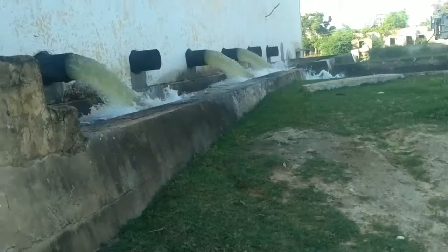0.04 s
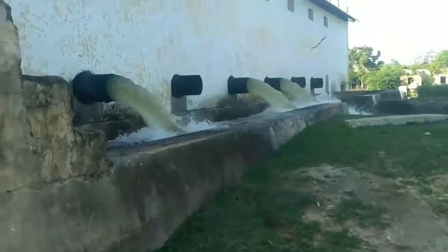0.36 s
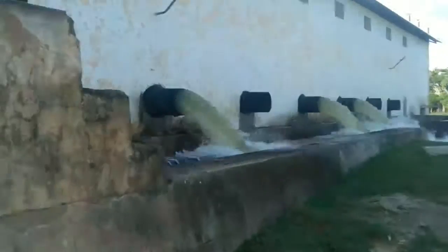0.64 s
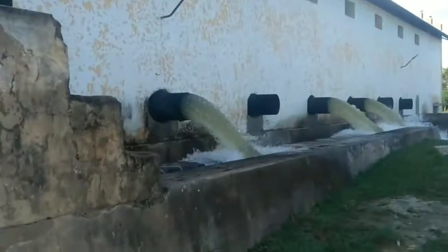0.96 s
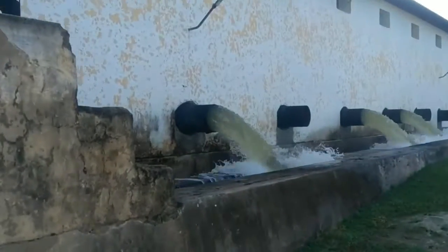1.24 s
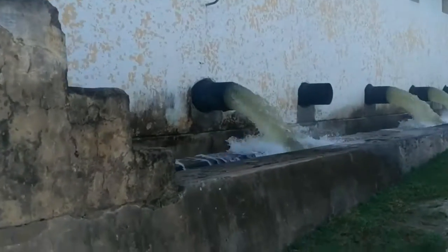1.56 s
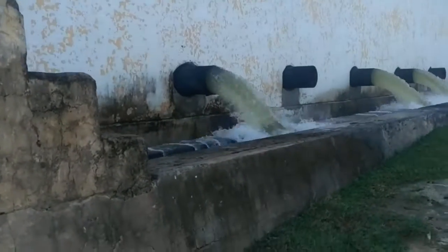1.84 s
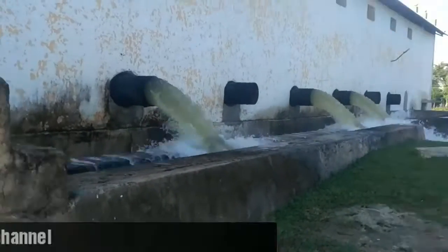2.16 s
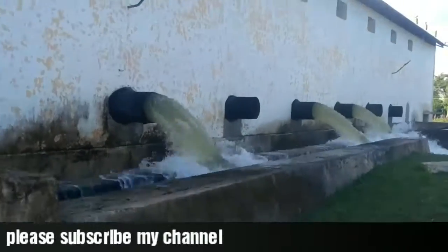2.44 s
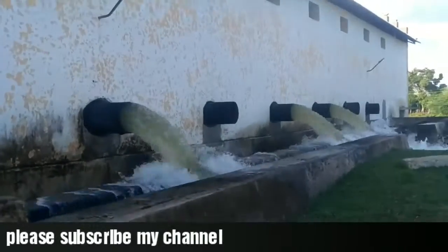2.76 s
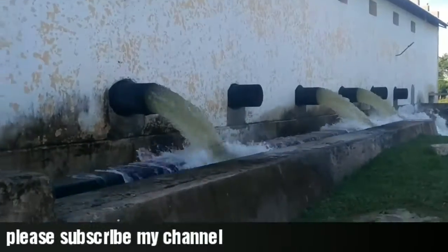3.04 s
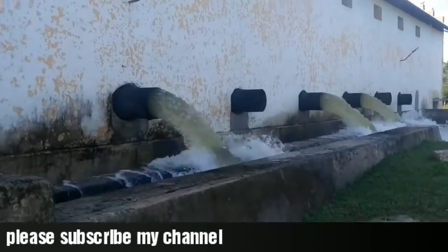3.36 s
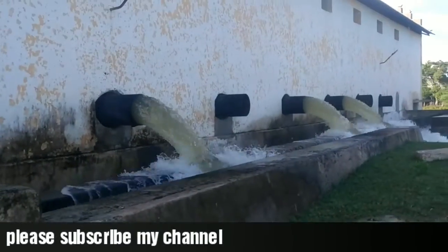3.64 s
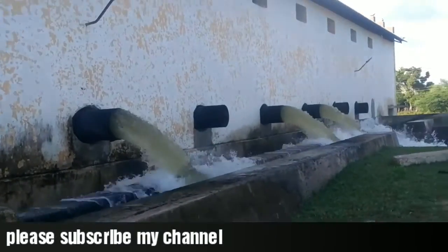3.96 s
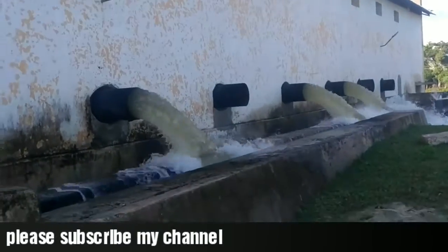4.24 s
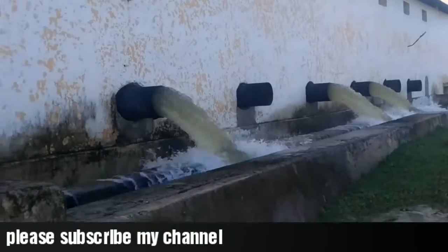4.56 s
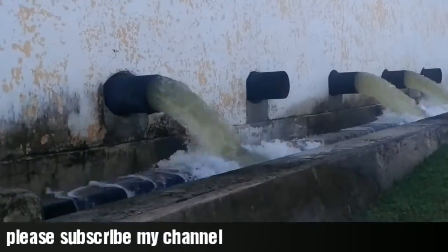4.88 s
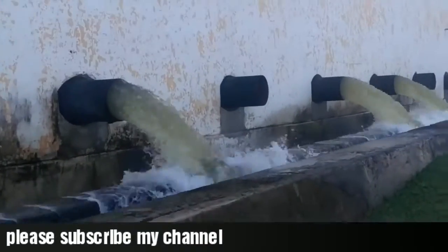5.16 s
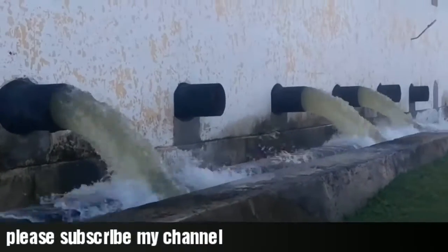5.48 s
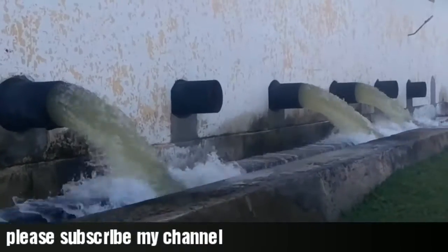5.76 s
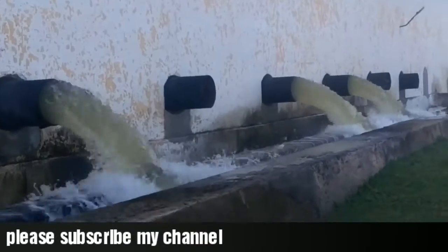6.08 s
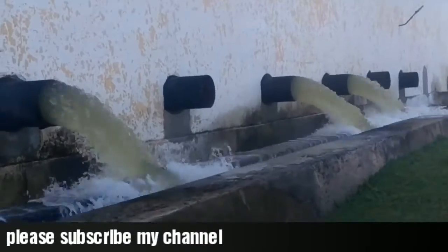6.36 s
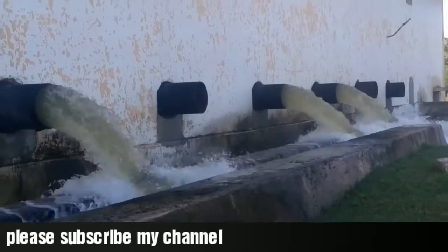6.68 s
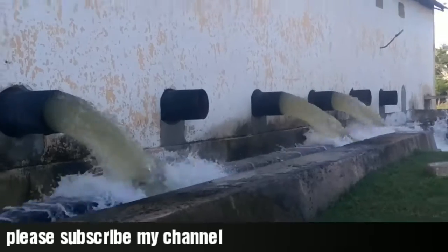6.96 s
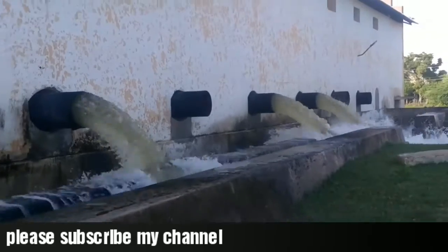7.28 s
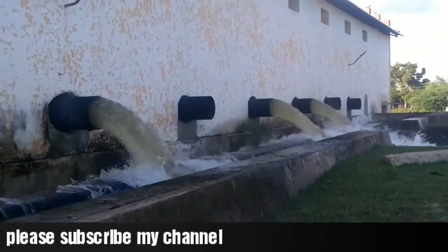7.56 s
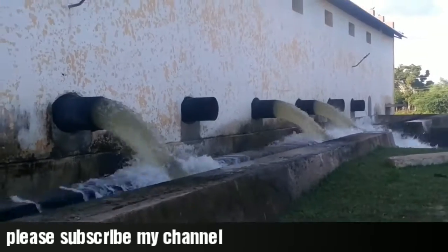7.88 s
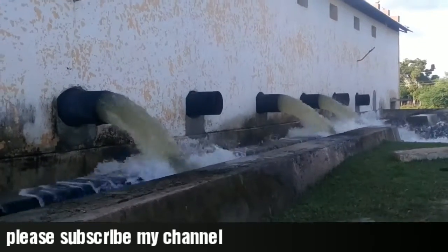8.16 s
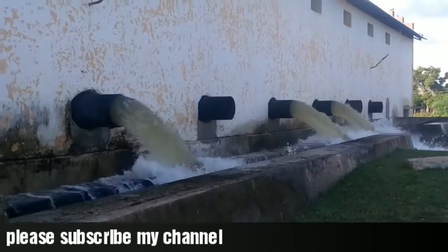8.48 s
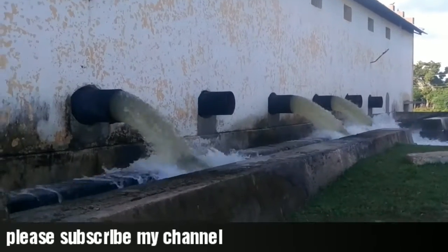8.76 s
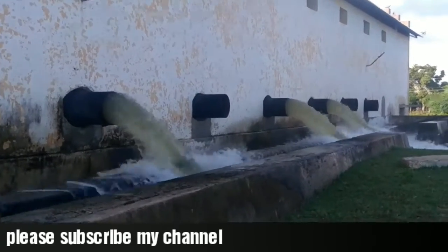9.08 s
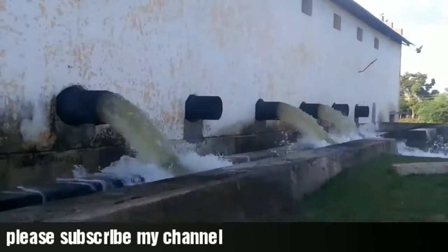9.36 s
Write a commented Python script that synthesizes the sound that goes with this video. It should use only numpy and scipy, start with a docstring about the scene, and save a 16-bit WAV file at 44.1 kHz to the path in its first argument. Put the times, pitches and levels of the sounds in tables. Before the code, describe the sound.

After a loud rush and a sharp knock, jets of water churn, bubble and fizz in an outdoor channel under gusts of wind rumble.

```python
"""The water sounds loud and full at first, with a knock, then turns quieter and muffled.
Beside a pump house, thick jets fall from pipes into a concrete channel. Close by, the plunge churns with
big bubbles, drops splash, spray hisses and foam fizzes; the farther jets merge into a wash.
One microphone stands in the open, and wind buffets it."""
import sys
import numpy as np
from scipy import signal
from scipy.fft import rfft, irfft, next_fast_len
from scipy.io import wavfile

SR = 44100
rng = np.random.default_rng(int(sys.argv[2]) if len(sys.argv) > 2 else 0)


def put_to_file(sound):
    """Save the sound as 16-bit audio at rate SR, in the file named by the first command-line argument."""
    columns = np.atleast_2d(sound).T  # one column per channel
    safe = np.clip(columns, -1, 1)
    whole_steps = np.round(safe * 32767)
    wavfile.write(sys.argv[1], SR, whole_steps.astype(np.int16))


N = 415422
TIME = np.arange(N) / SR

# The loud opening, by layer. Each row: level in dB as the hold ends, that time in seconds,
# then rise, climb and fall in dB per second.
LOUD_OPENING = { "wind": (-27.5, 1.12, 138, -1, 170), "plunge": (-31, 1.1, 90, -0.5, 170),
                "babble": (-35, 1.1, 75, 1.5, 270), "splash": (-34, 1.09, 35, 2, 18),
                "spray": (-29.5, 1.1, 20, 26, 107), "fizz": (-21.5, 1.15, 73, 21, 288),
                "hiss": (-34, 1.15, 150, 4, 448), }
# The jet surges and drags more air under. Each row: time in seconds, large and small bubble levels in dB.
JET_SURGES = [(0.935, -34, -42), (1.4, -51, -46), (2.96, -45, -47), (3.24, -43, -53), (3.33, -45, -52),
              (3.41, -42.5, -46), (3.56, -52, -46.5), (3.77, -58, -48.5), (3.94, -43, -48),
              (4.1, -36.5, -45.5), (4.73, -45, -52), (5.07, -45, -58), (5.25, -45, -51), (5.96, -43.5, -55),
              (6.3, -59, -50.5), (6.63, -46, -58), (6.9, -39, -63), (7.22, -41, -55), (7.39, -42.5, -64),
              (7.69, -37.5, -52), (8.01, -43.5, -54), (8.31, -55, -48), (8.4, -58, -46), (8.56, -44.5, -54),
              (8.79, -55, -48), (9.25, -45, -58), (9.38, -44, -52)]
# Gulps of trapped air and slaps of water. Each row: time in seconds, level in dB before the trim,
# pitch in Hz, half-width in seconds.
AIR_GULPS = [(2.342, -37, 645, 0.0064), (2.351, -42, 1290, .008), (2.73, -35.5, 1950, .011),
             (2.967, -39, 516, .008), (3.004, -35, 2730, 0.0059), (3.013, -40, 1356, 0.0074),
             (3.346, -32, 409, 0.0068), (3.398, -38, 445, 0.014), (3.805, -41, 2870, 0.009),
             (3.92, -41, 1090, .016), (4.086, -35, 913, 0.0096), (4.096, -24, 359, 0.004),
             (4.110, -20.5, 351.4, 0.0038), (4.156, -40, 1270, .01), (4.40, -39, 2750, 0.028),
             (4.567, -35, 2690, 0.013), (4.733, -30.5, 398, .006), (4.754, -27, 430, 0.0038),
             (5.118, -41.5, 2140, 0.014), (5.285, -41, 925, 0.016), (5.535, -38, 934, .006),
             (5.94, -32, 287.5, 0.0055), (6.296, -38, 2460, 0.0074), (6.304, -42, 796, .009),
             (6.899, -34, 473, 0.0059), (7.262, -41, 732, 0.014), (7.97, -40.5, 1140, 0.0091),
             (8.065, -42.5, 1130, 0.014), (8.294, -39, 904, .011), (8.775, -40, 1378, 0.011),
             (9.236, -40.5, 538, .01)]
# Handfuls of drops land together. Each row: time in seconds, level in dB, bubble pitch in Hz.
DROP_SPURTS = [(3.05, -44.5, 2800), (4.27, -48.5, 2750), (4.95, -46, 2600), (5.14, -49.5, 2450),
               (5.52, -46, 2550), (5.77, -48, 2600), (6.08, -48, 2510), (6.48, -48, 2630), (6.9, -49, 2450),
               (8.86, -48.5, 2950), (8.92, -50.5, 3200), (9.37, -48, 2800)]

# Slow level changes of drops, foam and farther jets. Each row: time in seconds, dB before any trim.
DROP_LEVELS = [(1.95, -66), (2.35, -49), (3.5, -48.5), (4.5, -48.5), (6.4, -48), (8.3, -49.5),
               (9.42, -50.5)]
FOAM_LEVELS = [(1.3, -41.5), (1.7, -39.5), (2.15, -40), (2.45, -37.5), (2.65, -41.5), (4.2, -41),
               (5.6, -38.5), (8.2, -39), (9.2, -43.5), (9.42, -39.5)]
FAR_JET_LEVELS = [(1.3, -55), (2.4, -53), (4.5, -55), (4.8, -51.5), (8.1, -51.5), (8.35, -55.5),
                  (9.42, -57)]

# Spells of louder high hiss, narrow hiss and bright hiss. Each row: start and end in seconds, level in dB.
HIGH_HISS_SPELLS = [(1.28, 1.44, -35.5), (1.6, 1.72, -45), (2.03, 2.04, -45), (2.74, 2.75, -39),
                    (2.98, 3.02, -42), (3.15, 3.22, -46), (4.7, 8.05, -44.5)]
HISS_TRAILS = [(1.26, 1.35, -39), (1.47, 1.66, -41), (3.87, 4.42, -52.5)]
HISS_SWELLS = [(2.77, 3.09, -40)]

# Gusts on the microphone. Each row: time in seconds, level in dB, half-width in seconds.
WIND_GUSTS = [(1.112, -27, .012), (1.2, -38, .025), (1.28, -43, .02), (1.6, -36, 0.017), (1.93, -35, .05),
              (2.155, -33.5, 0.041), (2.42, -37, .08), (2.558, -31, 0.052), (3.03, -44, 0.04),
              (4.03, -32.5, .02), (4.603, -34.5, 0.078), (5.164, -40, .025), (5.253, -34, 0.034),
              (5.77, -40.5, .04), (6.26, -36, .03), (6.623, -30, 0.087), (6.8, -38, 0.028),
              (7.192, -37, 0.052), (7.753, -26, 0.061), (7.859, -24.5, 0.024), (8.068, -33.5, 0.046),
              (8.27, -34, 0.027), (9.25, -42, .03)]
# Hard buffets of air. Each row: time in seconds, level in dB, pitch in Hz, half-width in seconds.
WIND_BUFFETS = [(.815, -2, 140.1, 0.0018), (.83, -18.5, 76, .01), (.934, -9, 175, 0.0044),
                (1.108, -23.5, 139.8, 0.0099), (1.592, -26, 103.4, 0.0025), (2.135, -21.5, 78.4, .009),
                (2.17, -25.5, 108.2, 0.0068), (2.337, -24, 95.7, 0.013), (2.368, -23, 91, 0.0094),
                (2.412, -22, 69.7, .009), (2.446, -21, 101, .006), (2.494, -20, 97, 0.0047),
                (2.541, -12, 87, 0.0059), (2.6, -24, 78.2, 0.0075), (4.025, -24, 81.7, .009),
                (4.61, -26, 85.3, 0.018), (4.688, -27, 112.5, 0.0038), (5.856, -29.5, 100.4, .005),
                (6.251, -28, 86.3, 0.0081), (6.6, -28.5, 220, 0.011), (6.63, -27, 83, 0.011),
                (7.70, -27.5, 229.6, 0.013), (7.76, -24.5, 91.5, 0.016), (7.854, -12, 100.6, 0.0062),
                (8.26, -25.5, 69.2, 0.015), (8.5, -27, 75, 0.0076), (8.57, -29, 70, .008)]

# The colour of each sound at the microphone. Each row: frequency in Hz, relative level in dB.
PLUNGE_SPECTRUM = [(120, -19), (200, -0.5), (260, 0.5), (340, -1), (400, -2), (490, -7), (560, -16),
                   (750, -45)]
BABBLE_SPECTRUM = [(350, -28), (540, -4.5), (630, -5), (750, -1.5), (900, -0.5), (1050, -3), (1250, -12),
                   (1650, -15)]
SPLASH_SPECTRUM = [(1000, -27), (1250, -4.5), (1550, -2.5), (1850, -5), (2250, -3), (2700, -0.5),
                   (3100, -2), (3500, -4), (3900, -8.5), (4500, -38)]
SPRAY_SPECTRUM = [(5200, -12.5), (6100, -7), (7000, -3.5), (8000, 0.5), (9200, 0), (9700, -2.5),
                  (10800, -19)]
FOAM_SPECTRUM = [(7500, -20), (9400, -8), (10500, -2.5), (11600, 0.5), (12800, -1.5), (14400, -6),
                 (15200, -11.5), (16000, -16)]
FAR_JET_SPECTRUM = [(1200, -13), (2500, -2.5), (3700, -1), (4600, 3.5), (5800, -2), (7000, -17.5),
                    (10000, -17)]
OPENING_SPECTRUM = [(400, -10), (600, 8), (850, -2), (1400, -7), (2000, -1), (2700, -13), (3500, 2),
                    (4000, 2), (4600, 1.5), (5800, 1), (6800, -2), (9000, -20)]
TRAIL_SPECTRUM = [(1100, -33), (1500, -9), (2300, -22), (2650, 4), (3100, 1), (3500, -19), (3900, -39)]
SWELL_SPECTRUM = [(1800, -10.5), (3200, -2.5), (4100, 1), (4450, -3), (4750, -17), (5000, 0), (5350, 0.5),
                  (6500, -4.5), (8500, -7)]
WIND_SPECTRUM = [(15, -44), (25, -22), (40, -5.5), (62, 3), (85, 1), (135, -2), (190, -5), (250, -10),
                 (320, -20), (450, -28), (900, -46)]
KNOCK_SPECTRUM = [(200, 5), (900, -1), (2500, -4), (5500, -11), (8000, -3.5), (11500, 5.5), (15500, -5.5)]


def from_db(db):
    """Decibels to gain."""
    return 10 ** (np.asarray(db) / 20)


def rms_one(x):
    """Scale to an rms of 1."""
    return x / np.sqrt(np.mean(x ** 2) + 1e-20)


def together(*gains):
    """Unrelated sounds add in power."""
    return np.sqrt(sum(g ** 2 for g in gains))


def level_curve(rows):
    """Gain at every sample from rows of seconds and dB."""
    return from_db(np.interp(TIME, *np.transpose(rows)))


def bell(t, half_width):
    """A smooth swelling around t = 0."""
    return np.exp(-.5 * np.minimum((t / half_width) ** 2, 100))


def spell(start, end, db, rise, fall):
    """Gain that rises, holds and falls; rise and fall in dB per second."""
    below_db = rise * np.maximum(start - TIME, 0) + fall * np.maximum(TIME - end, 0)
    return from_db(db - np.minimum(below_db, 120))


def spells(rows, rise, fall):
    """Gain of several spells that share one rise and fall."""
    return together(*(spell(start, end, db, rise, fall) for start, end, db in rows))


def drift(rate):
    """A smooth random wander of rms 1 that changes about rate times a second."""
    step, settle = 40, 2000
    pole = np.exp(-2 * np.pi * rate * step / SR)
    noise = rng.standard_normal(N // step + settle + 2)
    slow = signal.lfilter([1], [1, -2 * pole, pole * pole], noise)[settle:]
    return np.interp(np.arange(N) / step, np.arange(len(slow)), rms_one(slow))


def coloured(x, spectrum):
    """Shape a steady sound by rows of Hz and dB, to an rms of 1."""
    size = next_fast_len(N)
    hz, db = np.transpose(spectrum)
    bins = np.maximum(np.arange(size // 2 + 1) * SR / size, 1)
    gain = from_db(np.interp(np.log(bins), np.log(hz), db, left=-90, right=-90))
    return rms_one(irfft(rfft(x, size) * gain, size)[:N])


def pings(low_hz, high_hz, per_s, cycles, spread_db, clump_db, clump_hz, pitches):
    """Bubbles or droplets ring at random, in clumps; each dies by 60 dB over the given cycles."""
    out, shared = np.zeros(N), 0.36 * drift(clump_hz)
    floor = 1e-12 * rng.standard_normal(N)
    for hz in np.geomspace(low_hz, high_hz, pitches):
        at = rng.integers(0, N, int(per_s / pitches * N / SR))
        sizes = from_db(spread_db * np.minimum(rng.exponential(1, len(at)), 4))
        kicks = np.bincount(at, sizes * rng.choice([-1, 1], len(at)), N) + floor
        decay, angle = np.exp(-np.log(1000) * hz / (cycles * SR)), 2 * np.pi * hz / SR
        rings = signal.lfilter([1, 0, -1], [1, -2 * decay * np.cos(angle), decay * decay], kicks)
        # each pitch surges mostly on its own, a little with all the others
        clumps = from_db(clump_db * (drift(clump_hz) + shared))
        out += np.sqrt(hz) * rms_one(rings) * clumps  # even power per Hz
    return out


def throbs(rows, waver):
    """Each row is a short ringing that swells and dies; its pitch wavers by the share waver."""
    out, span = np.zeros(N), 2 ** 13
    for s, db, hz, half_width in rows:
        wander = signal.lfilter([1], [1, -.99], rng.standard_normal(span)) / 7
        at = np.clip(round(s * SR) + np.arange(span) - span // 2, 0, N - 1)
        phase = rng.random() + np.cumsum(hz * (1 + waver * wander)) / SR
        out[at] += from_db(db) * bell(TIME[at] - s, half_width) * np.sin(2 * np.pi * phase)
    return out


def opening(layer, full_s=.82):
    """One layer's gain in the loud opening: the level builds, holds while the treble climbs, then drops."""
    db, end, rise, climb, fall = LOUD_OPENING[layer]
    return spell(full_s, end, db - climb * np.maximum(end - TIME, 0), rise, fall)


def churn(plunge_db=-48, babble_db=-52):
    """Air dragged under by the near jets rings as large bubbles; smaller ones babble at the surface."""
    large = pings(170, 583, per_s=900, cycles=16.2, spread_db=3, clump_db=2.5, clump_hz=14.5, pitches=10)
    small = pings(534, 1365, per_s=1800, cycles=26.6, spread_db=2, clump_db=2, clump_hz=11.7, pitches=12)
    deep, shallow = from_db(plunge_db), from_db(babble_db)
    for s, large_db, small_db in JET_SURGES:
        surge = bell(TIME - s, half_width=.032)
        deep = together(deep, from_db(large_db) * surge)
        shallow = together(shallow, from_db(small_db) * surge)
    plunge = together(deep, opening("plunge")) * coloured(large, PLUNGE_SPECTRUM)
    babble = together(shallow, opening("babble")) * coloured(small, BABBLE_SPECTRUM)
    gulps = from_db(-2.5) * throbs(AIR_GULPS, waver=0.098)
    return plunge + babble + gulps


def splash(trim_db=-1.4):
    """Thrown drops fall back into the channel and leave small bubbles; a spurt rings near one pitch."""
    drops = pings(1145, 4610, per_s=9000, cycles=48, spread_db=1.5, clump_db=3, clump_hz=10.8, pitches=28)
    gain = from_db(trim_db) * together(level_curve(DROP_LEVELS), opening("splash"))
    out = gain * coloured(drops, SPLASH_SPECTRUM)
    handful = pings(1910, 4000, per_s=3000, cycles=44, spread_db=1.5, clump_db=1, clump_hz=11, pitches=16)
    width = 2 ** .65  # .65 octaves to either side
    for s, db, hz in DROP_SPURTS:
        band = [(hz / width, -25), (hz, 0), (hz * width, -25)]
        out += from_db(db) * bell(TIME - s, half_width=.024) * coloured(handful, band)
    return out


def spray(steady_db=-51.5):
    """Fine droplets patter on water and concrete; their high hiss sounds louder in spells."""
    mist = pings(4150, 10630, per_s=24000, cycles=53, spread_db=.5, clump_db=1.5, clump_hz=19, pitches=14)
    louder = spells(HIGH_HISS_SPELLS, rise=130, fall=100)
    return together(from_db(steady_db), louder, opening("spray")) * coloured(mist, SPRAY_SPECTRUM)


def fizz(flutter_db=.5):
    """Foam on the channel bursts in countless tiny bubbles; its level flutters a little."""
    foam = pings(8920, 15970, per_s=42000, cycles=87, spread_db=-2.5, clump_db=1.5, clump_hz=22,
                 pitches=18)
    steady = level_curve(FOAM_LEVELS) * from_db(flutter_db * drift(8.7))
    return together(steady, opening("fizz")) * coloured(foam, FOAM_SPECTRUM)


def far_jets(flutter_db=1.35):
    """The jets farther from the microphone merge into one wash."""
    gain = level_curve(FAR_JET_LEVELS) * from_db(flutter_db * drift(16))
    return gain * coloured(rng.standard_normal(N), FAR_JET_SPECTRUM)


def hiss(sputter_db=1.2):
    """Three hisses come and go: a broad one at the opening, its narrow trail, a bright sputtering swell."""
    trail = spells(HISS_TRAILS, rise=96, fall=106)
    swell = spells(HISS_SWELLS, rise=60, fall=75) * from_db(sputter_db * drift(15))
    parts = (opening("hiss"), OPENING_SPECTRUM), (trail, TRAIL_SPECTRUM), (swell, SWELL_SPECTRUM)
    return sum(gain * coloured(rng.standard_normal(N), spectrum) for gain, spectrum in parts)


def wind(breeze_db=-48.5):
    """Eddies at the microphone port make a lumpy rumble: a restless breeze, gusts and hard buffets."""
    rumble = coloured(rng.standard_normal(N), WIND_SPECTRUM)
    eddies = rms_one(rumble * from_db(1.26 * drift(12.5)))
    breeze = from_db(breeze_db + 1.9 * drift(12))
    gusts = (from_db(db) * bell(TIME - s, half_width) for s, db, half_width in WIND_GUSTS)
    return together(breeze, opening("wind"), *gusts) * eddies + throbs(WIND_BUFFETS, waver=0.11)


def knock(at_s=.8102, db=-3.5):
    """A short, sharp scuff right against the microphone."""
    scuff = np.tanh(coloured(rng.standard_normal(N), KNOCK_SPECTRUM))
    return from_db(db) * bell(TIME - at_s, half_width=.0014) * scuff


def scene():
    """Water, hiss and wind at one microphone beside the channel."""
    water = churn() + splash() + spray() + fizz() + far_jets()
    return (water + hiss() + wind() + knock())[None]


def record(dry, start_s=.642, fade_s=.011, ceiling=.65, cutoff_hz=15780):
    """The microphone opens abruptly, peaks are rounded, the highest treble is cut."""
    opened = np.clip((TIME - start_s) / fade_s, 0, 1)
    rounded = ceiling * np.tanh(dry * opened / ceiling)
    lowpass = signal.ellip(12, .2, 80, cutoff_hz, fs=SR, output="sos")
    return signal.sosfilt(lowpass, rounded)


dry = scene()
out = record(dry)
put_to_file(out)
```